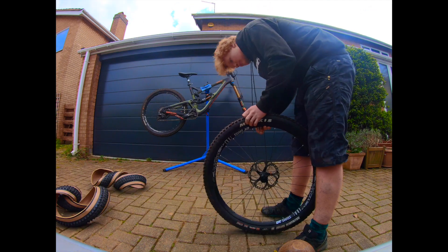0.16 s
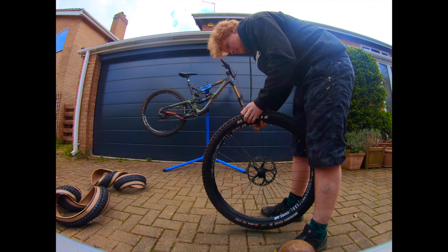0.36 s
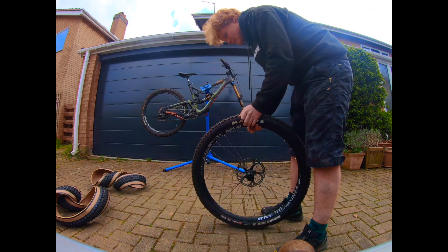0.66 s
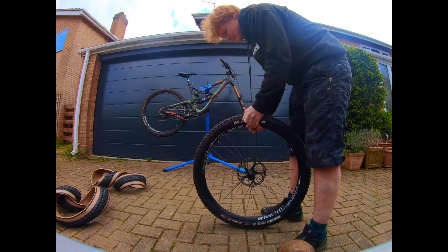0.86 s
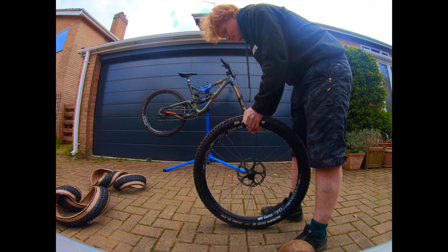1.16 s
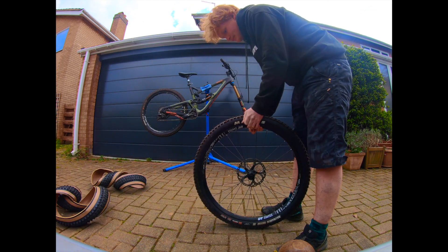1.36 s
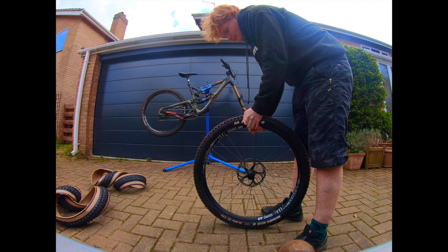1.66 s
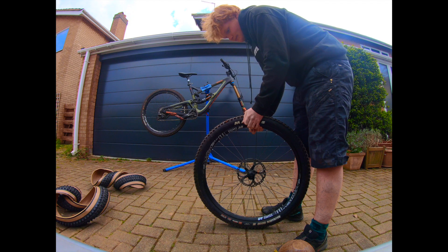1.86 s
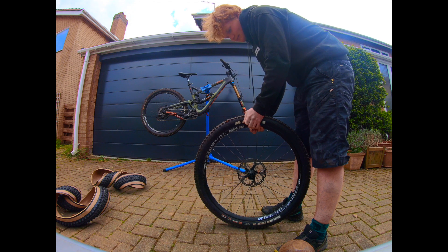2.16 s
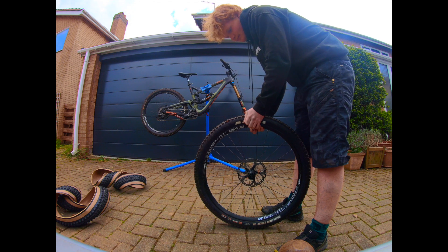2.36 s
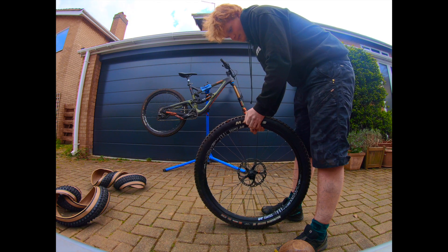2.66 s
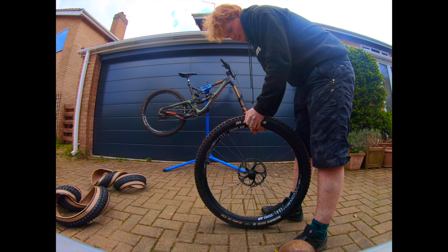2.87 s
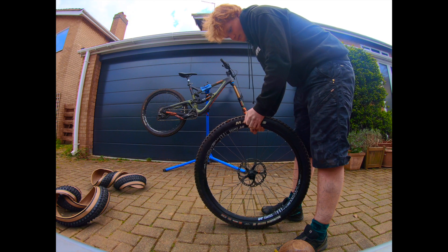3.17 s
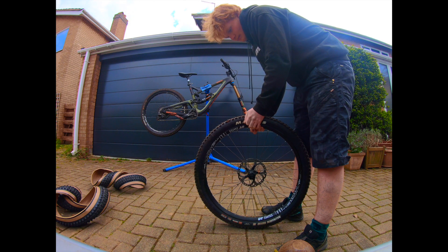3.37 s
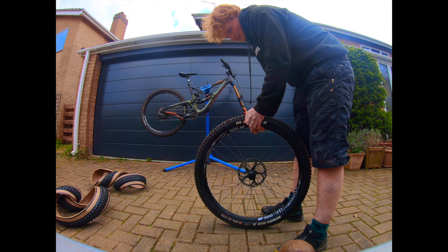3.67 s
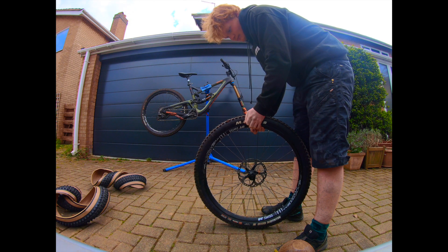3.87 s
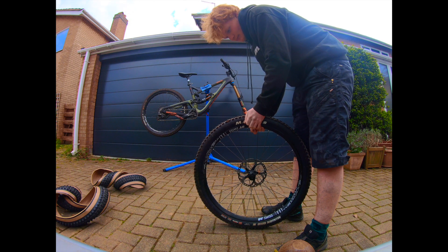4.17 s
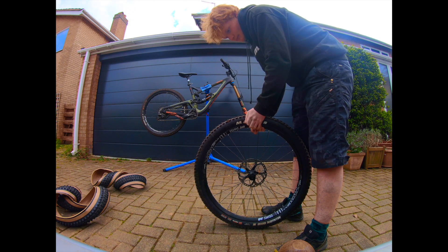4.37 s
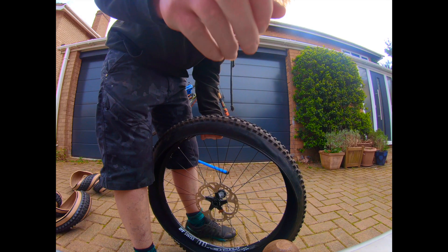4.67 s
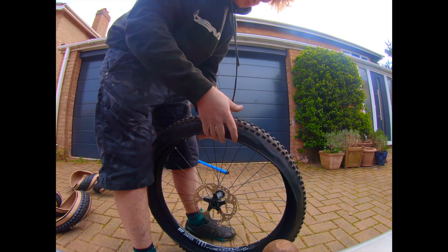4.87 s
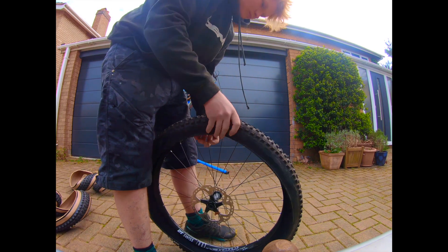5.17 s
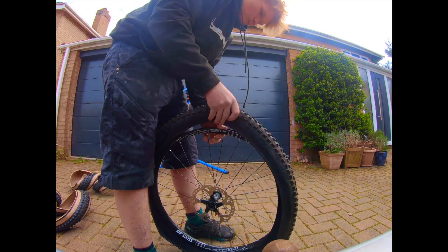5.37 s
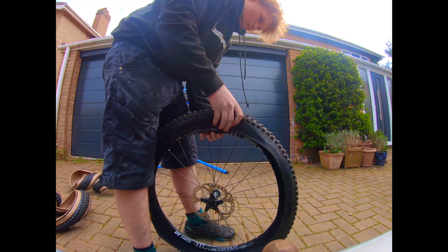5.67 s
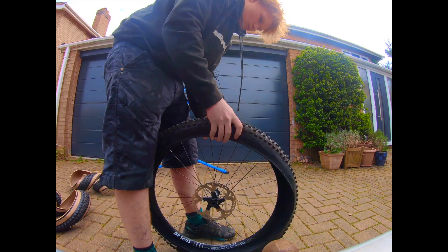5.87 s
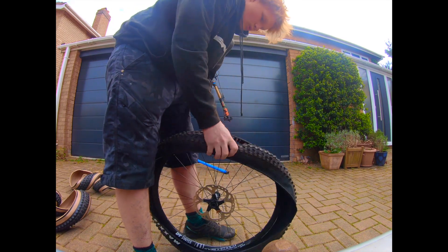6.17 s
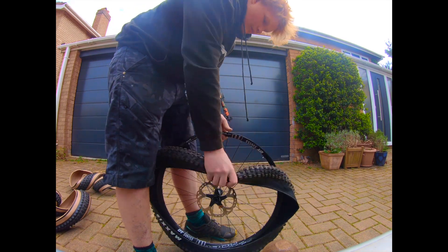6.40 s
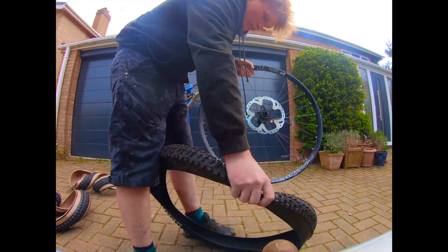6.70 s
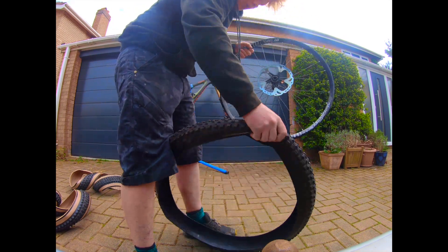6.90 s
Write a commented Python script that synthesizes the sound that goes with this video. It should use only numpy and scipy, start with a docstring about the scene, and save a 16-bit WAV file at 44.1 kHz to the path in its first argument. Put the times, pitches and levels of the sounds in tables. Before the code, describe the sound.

Air hisses sharply from a bicycle tyre valve and slowly weakens, cuts to brief silence, then close knocks and rubbery scrapes as the tyre comes off.

```python
"""A bicycle tyre valve lets out an air jet on a paved drive: turbulent noise in three bands, in stereo.
A far engine hums behind it as beating sines over dull traffic noise; the sound is then faded out.
After a short silence, nearer and in mono, the tyre is worked off the rim: filtered noise drags and rasps,
blows ring the casing and rim, snaps and ticks are short bursts, and thin tones squeak.
Low pressure pulses and buffeting reach the microphone, and gliding sines call like birds."""
import sys
import numpy as np
from scipy import signal
from scipy.fft import rfft, irfft, next_fast_len
from scipy.io import wavfile
from scipy.ndimage import uniform_filter1d, map_coordinates

SR = 44100
rng = np.random.default_rng(int(sys.argv[2]) if len(sys.argv) > 2 else 0)


def generate_wav(signal):
    """Clip the signal to [-1, 1] and save it as 16-bit WAV at the path in sys.argv[1]."""
    frames = np.transpose(np.atleast_2d(signal))
    scaled = np.clip(frames, -1, 1) * 32767
    pcm = np.round(scaled).astype(np.int16)
    wavfile.write(sys.argv[1], SR, pcm)


N = 310464

# Jet strength as the pressure falls: t/s, jet level/dB, low band re jet/dB, middle band re jet/dB
JET_COURSE = [(0.03, -24, -16, -4.5), (0.04, -20.5, -19, -11.5), (0.11, -29.5, -10.5, -1.5),
              (0.18, -30, -11.5, -4.5), (0.25, -27.5, -14, -5.5), (1.59, -31, -14.5, -6.5),
              (4.36, -33.5, -16, -8.5), (4.48, -35, -15, -7.5)]
# Jet spectrum, relative: f/Hz, level per Hz/dB
JET_SPECTRUM = [(150, -62.5), (250, -24.5), (777, -13), (1070, -18), (1560, -6.5), (1690, -7.5), (2110, -8),
                (2860, -10.5), (3170, -8), (4840, -6.5), (7640, -3.5), (8750, -1.5), (10200, -3),
                (14300, -11.5), (15100, -76.5)]
# Bands lifted by the valve stem and by echoes off rim and paving: f/Hz, width/Hz, lift/dB
JET_LIFTS = [(1620, 110, -3), (2110, 90, -1), (2434, 220, 6), (3010, 90, 7), (3760, 87, 2.5), (4400, 36, 4),
             (5240, 100, 0), (5730, 140, 2.5), (6370, 150, 4.5), (7010, 180, 7), (7660, 240, 4.5),
             (8510, 100, 0.5), (9230, 430, 1), (10020, 230, 3), (10650, 310, 2.5)]
# Stereo likeness of left and right, one shared noise in the middle band, wider elsewhere: f/Hz, correlation/1
STEREO_LIKENESS = [(60, 0.82), (300, 0.88), (800, 0.69), (1500, 0.23), (2000, 1), (3800, 1), (4700, 0.7),
                   (6000, 0.56), (9000, 0.7), (14000, 0.85)]
# Stereo level difference: f/Hz, left minus right/dB
STEREO_LEVELS = [(60, -1), (99, -3), (160, -3), (270, -0.5), (450, -1.5), (740, -1), (1220, 0.5),
                 (2010, -1), (3330, 0), (5500, 1), (9080, -3), (15000, 1.5)]
# Stereo phase difference: f/Hz, lead of left/rad
STEREO_PHASES = [(60, 0.86), (4600, 0), (5200, -0.3), (7000, -1), (8200, -1.5), (14000, -2)]
# Short echoes off hand, rim and paving: delay/s, gain at left/1, gain at right/1
NEAR_ECHOES = [(.00034, -0.11, -0.11), (.00045, -0.098, -0.23), (.00129, -0.012, -0.19),
               (.00141, -0.07, 0.038), (.00152, 0.027, 0.23), (.00166, -0.11, -0.2), (.00193, .09, -0.0034),
               (.00351, -0.077, -0.033), (.00517, 0.11, 0.045)]
# Resonances of the hollow tyre, before dulling: f/Hz, width/Hz, level/dB
CASING_MODES = [(137, 79, -5.5), (201.7, 38.4, 2), (348, 71, -7)]
# Resonances of bead and rim, before dulling: f/Hz, width/Hz, level/dB
RIM_MODES = [(483, 48, 2), (666, 99, 4), (788, 71, 5), (884, 155, 2.5), (1163, 200, -5.5), (1334, 67, -0.5),
             (1960, 110, -14.5)]
# Pulls on the tyre: start/s, peak/s, end/s, rubber drag/dB, knob rasp/dB, casing flex/dB (levels at the peak)
TYRE_PULLS = [(4.792, 4.83, 4.98, -74, -87, -42), (4.984, 5.007, 5.523, -57.5, -83, -51),
              (5.105, 5.207, 5.3, -56, -56, -65), (5.337, 5.379, 5.598, -52, -62.5, -55),
              (5.417, 5.42, 5.45, -59, -47.5, -54), (5.44, 5.461, 5.55, -45.5, -54.5, -53),
              (5.555, 5.573, 5.65, -57, -62, -68), (5.737, 5.756, 5.77, -49, -51.5, -60),
              (5.795, 5.92, 6.06, -50, -54.5, -50.5), (6.282, 6.307, 6.37, -36.5, -46, -50),
              (6.373, 6.39, 6.43, -40, -48.5, -48), (6.414, 6.628, 6.74, -36.5, -45, -40.5),
              (6.652, 6.731, 6.79, -46, -50.5, -56), (6.765, 6.876, 7.11, -65, -60, -73),
              (6.937, 6.98, 7.1, -52.5, -58.5, -53)]
# Rasp spectrum, relative: f/Hz, level per Hz/dB
RASP_SPECTRUM = [(1500, -36), (3000, 0.5), (4500, -2), (6500, -10.5), (10000, -17), (11500, -25.5),
                 (15000, -52)]
# Unsteady 3 kHz band noise, rasp of the rubbing over faint background: t/s, level/dB
BAND_NOISE_COURSE = [(4.63, -62), (4.69, -64), (4.76, -73), (4.84, -76), (5.08, -77), (5.24, -59.5),
                     (5.66, -63.5), (5.94, -55), (6.3, -74.5), (6.46, -53.5), (6.6, -53), (6.76, -58),
                     (7.04, -63)]
# Contacts, levels before the drive gains: t/s, rim/dB, casing/dB, snap/dB, T60/s
CONTACTS = [(4.691, -48, -37.5, -72, 0.024), (4.7143, -42.5, -58, -35.5, 0.008),
            (4.804, -51, -37.5, -66, 0.015), (4.864, -56, -45.5, -76, 0.025),
            (4.92, -57, -43.5, -73.5, 0.017), (5.015, -37.5, -38, -52.5, 0.061),
            (5.055, -45.5, -44.5, -68, 0.052), (5.152, -37.5, -46, -51, 0.044),
            (5.377, -26, -35.5, -40, 0.023), (5.422, -34, -54, -29, 0.061), (5.457, -39, -41, -34.5, 0.13),
            (5.626, -35, -55, -53, 0.022), (5.717, -35.5, -51, -53, 0.011),
            (5.747, -23.5, -52, -36.5, 0.028), (5.897, -41, -51, -53, 0.015),
            (5.926, -27, -39, -34.5, 0.045), (6.054, -34.5, -45, -51, 0.027), (6.289, -22, -34, -43, 0.03),
            (6.297, -18, -28, -33.5, 0.018), (6.305, -10.5, -17, -24.5, 0.036),
            (6.319, -18.5, -25, -20.5, 0.013), (6.325, -34, -27, -26, 0.059),
            (6.384, -19, -26, -28, 0.0474), (6.401, -18, -25, -39, .02), (6.414, -28, -26, -35, 0.034),
            (6.522, -34, -40, -44, 0.059), (6.6, -23.5, -32.5, -48, 0.036), (6.641, -28, -34.5, -36, 0.054),
            (6.652, -30, -49, -35, 0.022), (6.72, -19.5, -34, -28.5, 0.04), (6.955, -30.5, -37, -56, 0.2),
            (7.016, -27, -53, -35, 0.22)]
# Hard edge of a contact: f/Hz, gain/dB
SNAP_SPECTRUM = [(700, -23), (1200, 7.5), (2000, 3), (3500, 1), (4500, -10.5), (5500, -18), (8000, -33),
                 (11500, -55), (15000, -79)]
# Thin high ticks: t/s, initial level/dB, f/Hz
TICK_EVENTS = [(5.826, -57, 4000), (5.839, -52, 5500), (6.244, -56, 4800), (6.567, -42, 10300),
               (6.841, -42, 9500), (6.913, -46.5, 9600)]
# Thin tones as the bead slides: start/s, end/s, start f/Hz, end f/Hz, mean level/dB
SQUEAK_TONES = [(5.46, 5.6, 1370, 1360, -47), (6.515, 6.55, 820, 1000, -36.5),
                (6.63, 6.69, 3800, 3500, -54), (6.955, 7.0, 2100, 2370, -52.5)]
# Puffs of air: t/s, peak level/dB, f/Hz, sign (push positive, suck negative)
AIR_PUFFS = [(4.73, -39, 55, -1), (5.165, -32.5, 39, -1), (5.276, -29, 50.6, -1), (5.345, -37, 50.4, 1),
             (5.666, -36.5, 55.4, 1), (5.895, -39, 51.3, -1.214), (6.31, -29, 61.4, -1), (6.42, -34, 60, 1),
             (6.63, -40, 49.63, 1), (6.745, -31.5, 55.6, -1)]
# Air buffeting the microphone: t/s, level/dB
GUST_COURSE = [(4.75, -55), (4.85, -53), (5.3, -49), (5.5, -61), (5.75, -46.5), (6.1, -57), (6.7, -50),
               (7.04, -60)]
# Buffeting spectrum, relative: f/Hz, level per Hz/dB
GUST_SPECTRUM = [(12, -40), (20, 1.5), (52, 0.5), (91, -7), (130, -6), (170, -21), (290, -120)]
# Bird notes: start/s, end/s, start f/Hz, end f/Hz, mean level/dB
BIRD_NOTES = [(4.63, 4.7, 4050, 3700, -61.5), (5.004, 5.017, 3670, 4900, -56),
              (5.092, 5.14, 3470, 4450, -50), (5.187, 5.215, 4400, 5430, -57),
              (5.268, 5.323, 3280, 3160, -51.5), (5.315, 5.365, 2960, 2660, -57),
              (5.36, 5.388, 5600, 5760, -65), (6.241, 6.27, 2752, 2980, -58), (6.58, 6.62, 4420, 4460, -49),
              (6.904, 6.928, 3590, 3460, -53)]
# Far engine: t/s, firing f/Hz, level/dB, level of a second tone just below/dB
ENGINE_COURSE = [(0, 95.3, -74, -73), (.32, 96.9, -61, -63.5), (.45, 97.8, -64, -70), (.65, 97, -52.5, -64),
                 (.85, 94.9, -75, -87), (1.15, 95.6, -55, -69), (1.6, 96, -65, -58), (1.8, 95.5, -66, -68),
                 (2.05, 95.4, -56.5, -80), (2.45, 94.6, -38.5, -62), (2.7, 93.4, -47.5, -50),
                 (2.9, 93, -52.5, -46), (3.05, 94, -56, -69), (3.4, 93.6, -53, -50.5),
                 (3.7, 94.2, -56.5, -57), (4.0, 93.1, -51.5, -60), (4.5, 93, -57, -60)]
# Traffic spectrum, relative: f/Hz, level per Hz/dB
TRAFFIC_SPECTRUM = [(13, -41), (22, -4.5), (87, 4.5), (135, 0), (208, -3.5), (278, -9), (433, -13.5),
                    (500, -16), (650, -36), (1100, -120)]
# Decay of the yard's answer: f/Hz, T60/s
YARD_DECAY = [(200, 0.12), (2000, 0.25), (10000, 0.12)]
# Fade out, silence, fade in: t/s, gain/1
FADE_COURSE = [(0, 1), (4.482, 1), (4.502, 0), (4.625, 0), (4.72, 1), (7.04, 1)]

OPEN_S, LEAK_DB, POP_DB = .028, -9, -30.5  # the valve pin is pushed fully in; before that it only leaks
REST_DRAG_DB, REST_RASP_DB, REST_FLEX_DB = -65, -77, -58  # the tyre is never quite still in the hands
ENDS_DB = np.array([-15, -17, -13])  # drag, rasp and flex at the start and end of a pull, re its peak
RASP_PATCH_DB = 2  # depth of the streaks in the rasp
CASING_DRIVE_DB, RIM_DRIVE_DB, EDGE_DRIVE_DB = 25, 12, 6  # how strongly a contact drives each part
TICK_T60_S = .006
BEAT_S, BEAT_HZ, BEAT_HZ_PER_S = 3.41, 5.75, .8  # a moment when the tones add, their spacing then, its growth
LOWER_DB = -9.5  # the order at two thirds of the firing rate, re the firing tone
TRAFFIC_DB, TRAFFIC_DB_PER_S = -58.5, -0.37  # level at t = 0 and its drift
NEAR_START_S, TOP_HZ = 4.56, 15700  # start of the tyre work; upper band limit


def valve_jet():
    """Turbulent mixing noise: three bands fall unequally with the driving pressure."""
    def colour(hz):
        lift = sum(db * np.exp(-((hz - c) / w) ** 2) for c, w, db in JET_LIFTS)
        return amp(along(JET_SPECTRUM, hz) + lift)

    def below(hz, edge_hz):
        return 1 / (1 + (hz / edge_hz) ** 6)

    jet_db, low_db, middle_db = curves(JET_COURSE)
    age = np.arange(SR // 10) / SR
    # faint random tail that roughens the hiss
    tail = amp(-26.0 - 60 * age / 0.075) * (age > .003) * rng.standard_normal(len(age))
    low = spread(lambda hz: colour(hz) * np.sqrt(below(hz, 2080)), tail)
    middle = spread(lambda hz: colour(hz) * np.sqrt((1 - below(hz, 2140)) * below(hz, 5100)), tail)
    high = spread(lambda hz: colour(hz) * np.sqrt(1 - below(hz, 4800)), tail)
    bands = amp(-1.0) * high + amp(middle_db) * middle + amp(low_db) * low
    leaking = np.arange(N) / SR < OPEN_S
    flutter = amp(0.26 * wobble(29.97) + 0.39 * wobble(400) + LEAK_DB * leaking)
    return flutter * amp(jet_db) * bands


def valve_pop():
    """Impulsive release: the opening valve gives a low noise burst with exponential decay."""
    age = np.arange(N) / SR - OPEN_S
    spectrum = [(50, -44.5), (120, -2.0), (400, -9.5), (3000, -12.5), (6000, -29)]
    return amp(POP_DB - 60 * np.abs(age) / 0.049) * (age > 0) * coloured(rng.standard_normal(N), spectrum)


def spread(colour, tail):
    """Partial coherence: rms 1 stereo noise with near echoes and a tail that ripples its spectrum."""
    def channels(hz):
        turn = np.arccos(np.clip(along(STEREO_LIKENESS, hz), -1, 1)) / 2
        half = amp(along(STEREO_LEVELS, hz) / 2) * np.exp(.5j * along(STEREO_PHASES, hz))  # half the difference
        echoes = sum(np.outer(gains, np.exp(-2j * np.pi * hz * s)) for s, *gains in NEAR_ECHOES)
        left, right = 1 + echoes
        ripple = rfft(tail, 2 * len(hz) - 2) / (1 + hz / 6000)  # weaker in the treble
        shape = colour(hz) * (1 + ripple)
        left, right = left * half * shape, right / half * shape
        # each channel mixes both noises; the angle sets the likeness
        return np.array([[np.cos(turn) * left, np.sin(turn) * left],
                         [np.cos(turn) * right, -np.sin(turn) * right]])
    return unit(filtered(patchy(depth_db=1.5), channels).sum(axis=1))


def rubbing():
    """Friction excitation: rubber dragged over the rim flexes the casing, excites the rim and rasps."""
    drag_gain, rasp_gain, flex_gain = pulls()
    flex = np.hypot(flex_gain, amp(REST_FLEX_DB)) * unit(filtered(gritty(depth_db=4.0, rate=44), casing))
    slips = amp(2.1 * wobble(77)) * patchy(depth_db=3)[0]  # streaks come and go
    rubber = coloured(slips, [(200, -16.5), (450, 0.5), (1300, -4), (2500, -9), (5000, -39.5)])
    drag = np.hypot(drag_gain, amp(REST_DRAG_DB)) * unit(unit(filtered(slips, rim)) + 0.88 * rubber)
    streaks = amp(1.5 * wobble(170)) * patchy(depth_db=RASP_PATCH_DB)[0]
    rasp = np.hypot(rasp_gain, amp(REST_RASP_DB)) * coloured(streaks, RASP_SPECTRUM)
    return flex + drag + rasp


def pulls():
    """Exponential envelopes of drag, rasp and flex: each pull swells and dies away evenly in dB."""
    t = np.arange(N) / SR
    gains = np.zeros((3, N))
    for start, peak, end, *levels_db in TYRE_PULLS:
        away = np.maximum((peak - t) / (peak - start), (t - peak) / (end - peak))  # 0 at peak, 1 at ends
        gains += amp(np.array(levels_db)[:, None] + np.outer(ENDS_DB, away))
    return gains


def band_noise():
    """Amplitude-modulated band noise: unsteady near 3 kHz, rasp of the rubbing over faint background."""
    spectrum = [(1800, -66), (2400, -6.5), (3000, -4), (3700, -5), (4300, -12), (5200, -28), (6500, -56.5)]
    return amp(curves(BAND_NOISE_COURSE)[0]) * coloured(gritty(depth_db=3.5, rate=25), spectrum)


def knocks():
    """Impact excitation: a blow and a rough burst drive casing, rim and edge; short ones are mostly blow."""
    soft, firm, hard = np.zeros((3, N + SR))
    t = np.arange(SR // 4) / SR
    drive = amp([CASING_DRIVE_DB, RIM_DRIVE_DB, EDGE_DRIVE_DB])[:, None]
    for s, rim_db, casing_db, snap_db, t60 in CONTACTS:
        t60 = max(t60, .003)
        envelope = amp(-60 * t / t60) * (1 - np.exp(-t / (0.061 * t60)))
        burst = envelope * rng.standard_normal((3, len(t))) * np.sqrt(0.067 / t60)
        # the blow itself, as the load peaks
        burst[:, round(.05 * t60 * SR)] = np.array([16, 9, 3]) * min(1, 0.024 / t60)
        burst = burst * drive
        at = round(s * SR)
        soft[at:at + len(t)] += amp(casing_db) * burst[0]
        firm[at:at + len(t)] += amp(rim_db) * burst[1]
        hard[at:at + len(t)] += amp(snap_db) * burst[2]
    snap = filtered(hard[:N], lambda hz: amp(along(SNAP_SPECTRUM, hz)))
    return filtered(soft[:N], casing) + filtered(firm[:N], rim) + snap


def rim(hz):
    """Modal superposition: the rim's modes, dulled by the rubber on it."""
    return modes(RIM_MODES)(hz) / (1 + 1j * hz / 2500) ** 2


def casing(hz):
    """Modal superposition: the casing's modes, whose treble the soft contact rolls off."""
    return modes(CASING_MODES)(hz) / (1 + 1j * hz / 600) ** 2


def ticks():
    """Time-bandwidth principle: very short decaying bursts have only a broad pitch."""
    out, t = np.zeros(N + SR), np.arange(SR // 50) / SR
    for s, db, hz in TICK_EVENTS:
        grain = np.sin(2 * np.pi * hz * t) + .3 * rng.standard_normal(len(t))
        out[round(s * SR):][:len(t)] += amp(db - 60 * t / TICK_T60_S) * grain
    return out[:N]


def squeaks():
    """Frictional oscillation: the sliding bead gives thin gliding tones."""
    return sum(whistle(*tone, rough=0.023) for tone in SQUEAK_TONES)


def puffs():
    """Pressure pulse: about a cycle and a half of air pressure on the diaphragm, in a Gaussian envelope."""
    out, t = np.zeros(N), np.arange(N) / SR
    for s, db, hz, sign in AIR_PUFFS:
        cycles = (t - s) * hz
        envelope = np.exp(-(cycles - .6) ** 2 / 0.51)
        out += np.sign(sign) * amp(db) * envelope * np.sin(2 * np.pi * cycles - 1.5)
    return out


def gusts():
    """Flow noise: moving air buffets the microphone as low-frequency noise."""
    return amp(curves(GUST_COURSE)[0]) * coloured(rng.standard_normal(N), GUST_SPECTRUM)


def bird_notes():
    """Frequency glide: each note is one sine moving between two pitches."""
    return sum(whistle(*note, rough=0.0087) for note in BIRD_NOTES)


def engine():
    """Interference: the firing tone beats with a second tone below it, over a lower engine order."""
    hz, level_db, second_db = curves(ENGINE_COURSE)
    turn = 2 * np.pi * np.cumsum(hz) / SR
    since = np.arange(N) / SR - BEAT_S
    beat = 2 * np.pi * since * (BEAT_HZ + BEAT_HZ_PER_S * since / 2)
    hum = np.sqrt(2) * (amp(level_db) * np.sin(turn) + amp(second_db) * np.sin(turn - beat))
    lower = amp(level_db + LOWER_DB + 2.7 * wobble(6.6)) * np.sin(turn * 2 / 3 + 2.5 * wobble(3.1))
    return hum + lower


def traffic():
    """Incoherent summation: dull traffic is low-frequency noise with a steady drift in level."""
    level_db = TRAFFIC_DB + TRAFFIC_DB_PER_S * np.arange(N) / SR
    return amp(level_db) * spread(lambda hz: amp(along(TRAFFIC_SPECTRUM, hz)), np.zeros(1))


def yard(x):
    """Reverberation: each frequency of the walls' answer dies at its own speed."""
    hz, t, z = signal.stft(rng.standard_normal(SR // 2), SR, nperseg=256)
    decay = amp(-60 * t / along(YARD_DECAY, hz)[:, None])
    answer = signal.istft(z * decay, SR, nperseg=256)[1]
    late = np.pad(x, (500, 0))  # samples of delay before the answer
    return signal.fftconvolve(late, answer / np.linalg.norm(answer))[:N]


def amp(db):
    """Level law: amplitude ratio of a level in dB."""
    return 10 ** (np.asarray(db) / 20)


def unit(x):
    """Mean-square normalisation to rms 1."""
    return x / np.sqrt(np.mean(x ** 2) + 1e-20)


def along(points, hz):
    """Linear interpolation of (f/Hz, value) points on a logarithmic frequency axis."""
    f, v = np.transpose(points)
    return np.interp(np.log(hz + 1), np.log(f + 1), v)


def curves(rows):
    """Linear interpolation in time: one value per sample for each column after t/s."""
    s, *cols = np.transpose(rows)
    return [np.interp(np.arange(N) / SR, s, c) for c in cols]


def wobble(rate):
    """Band-limited fluctuation: a smooth random curve with rate knots a second."""
    knots = rng.standard_normal(int(N * rate / SR) + 4)
    return map_coordinates(knots, [np.arange(N) * rate / SR])


def filtered(x, response):
    """Convolution theorem: the spectrum of x times a complex response."""
    m = next_fast_len(N + SR // 2)
    return irfft(rfft(x, m) * response(np.fft.rfftfreq(m, 1 / SR)), m)[..., :N]


def modes(table):
    """Modal superposition: causal response of damped resonances with alternating sign."""
    def response(f):
        return sum((-1) ** k * amp(db) * 1j * f * w / (c * c - f * f + 1j * f * w)
                   for k, (c, w, db) in enumerate(table))
    return response


def coloured(x, spectrum):
    """Spectral shaping: x filtered to a spectrum, at rms 1."""
    return unit(filtered(x, lambda hz: amp(along(spectrum, hz))))


def gritty(depth_db, rate):
    """Amplitude modulation: noise whose size varies at random."""
    return amp(depth_db * wobble(rate)) * rng.standard_normal(N)


def patchy(depth_db):
    """Intermittency: two white noises whose bands swell and sink in patches, as eddies come and go."""
    z = signal.stft(rng.standard_normal((2, N)), nperseg=512)[2]
    across = uniform_filter1d(rng.standard_normal(z.shape[1:]), size=3, axis=0)  # smooth in frequency
    field = uniform_filter1d(across, size=16, axis=1)  # then in time
    return signal.istft(z * amp(depth_db * unit(field)), nperseg=512)[1][:, :N]


def whistle(start, end, hz0, hz1, db, rough):
    """Phase integration: one gliding sine, unsteady in pitch and strength."""
    out, t = np.zeros(N), np.arange(round((end - start) * SR)) / SR
    hz = np.linspace(hz0, hz1, len(t)) * (1 + rough * wobble(397)[:len(t)])
    arch = np.abs(np.sin(np.pi * t / t[-1])) ** .5
    shape = amp(db + 1.9 * wobble(203)[:len(t)]) * arch
    out[round(start * SR):][:len(t)] = shape * np.sin(2 * np.pi * np.cumsum(hz) / SR)
    return out


def scene():
    """Superposition: the jet and street sum first, then the near sounds and the yard's answer."""
    first = valve_jet() + valve_pop() + engine() + traffic()
    hits = knocks() + ticks() + squeaks()
    notes = bird_notes()
    near = hits + amp(-12.0) * yard(hits) + rubbing() + band_noise() + puffs() + gusts()
    near = near + notes + amp(-2.5) * yard(notes)
    return np.where(np.arange(N) < NEAR_START_S * SR, first, near)


def record(dry):
    """Band limitation: fade out, silence and fade in, with nothing kept above the limit."""
    return filtered(dry * curves(FADE_COURSE)[0], lambda hz: hz < TOP_HZ)


dry = scene()
out = record(dry)
generate_wav(out)
```